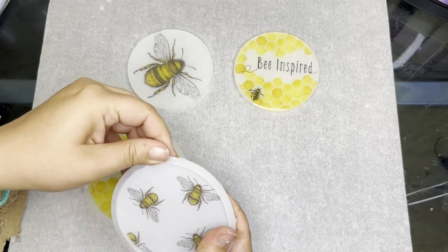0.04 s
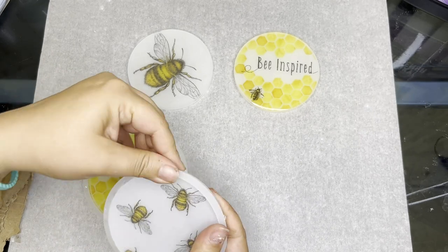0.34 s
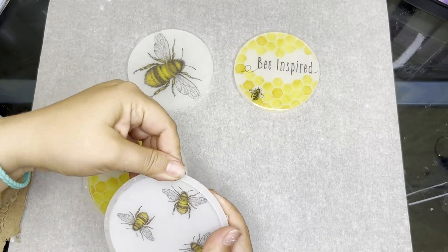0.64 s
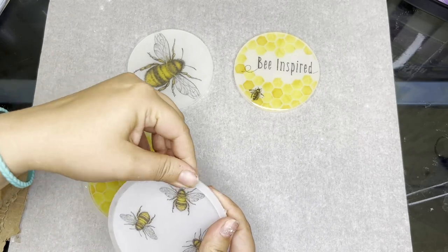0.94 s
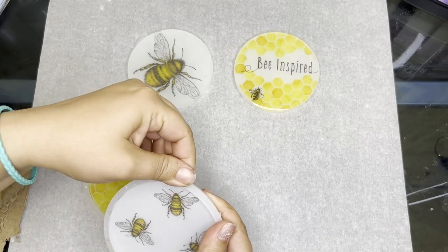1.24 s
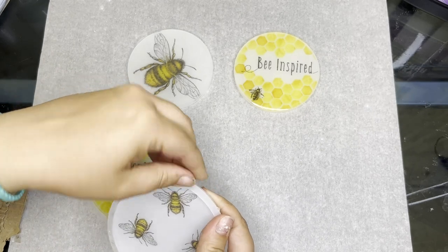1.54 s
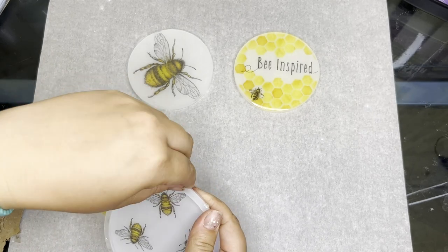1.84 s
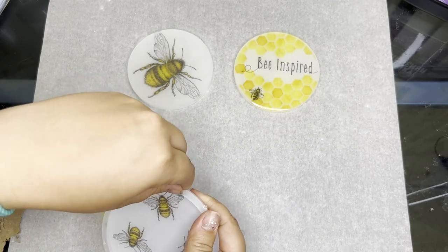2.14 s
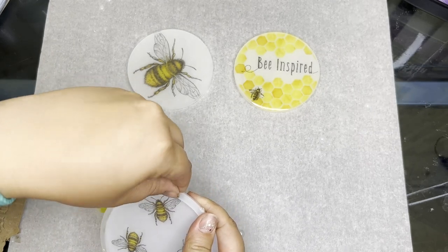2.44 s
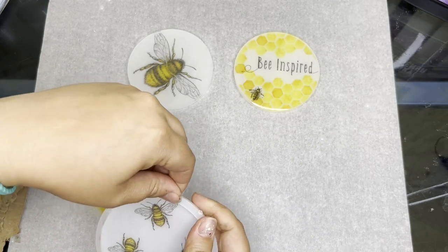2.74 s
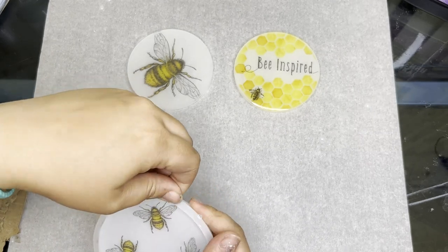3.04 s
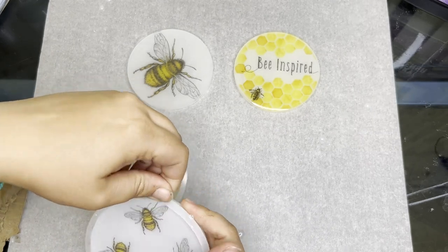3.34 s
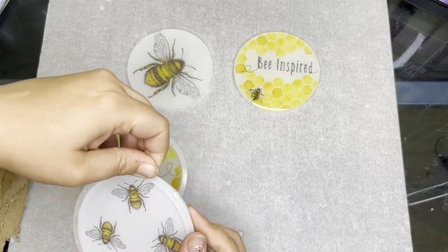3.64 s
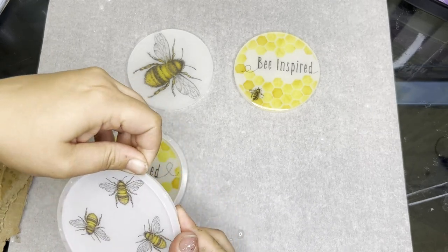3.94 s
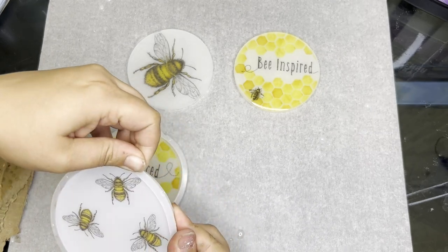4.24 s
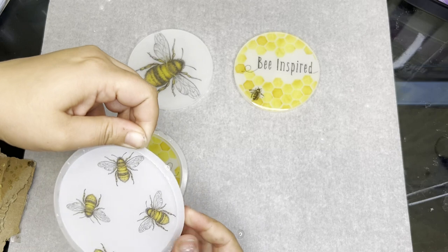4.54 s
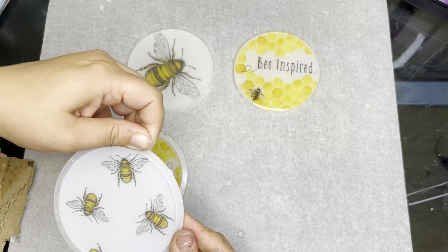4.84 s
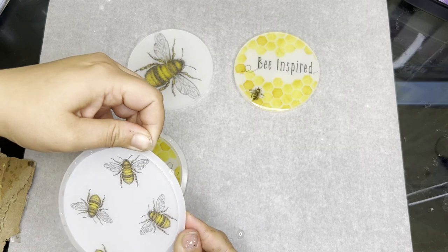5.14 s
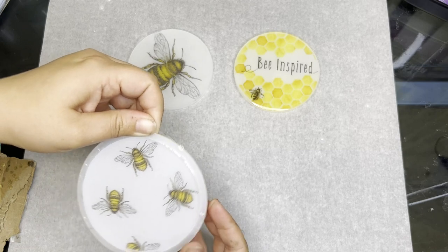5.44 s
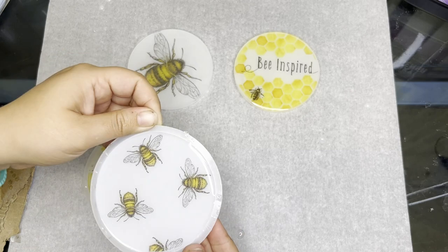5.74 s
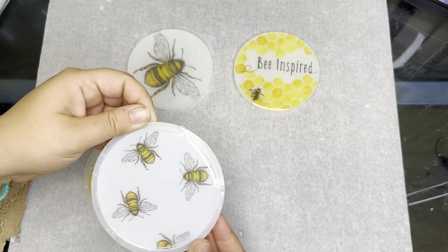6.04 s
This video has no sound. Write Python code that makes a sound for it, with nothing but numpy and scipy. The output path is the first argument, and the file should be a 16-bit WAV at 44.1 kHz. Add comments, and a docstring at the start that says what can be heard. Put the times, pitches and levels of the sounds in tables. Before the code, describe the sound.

Close to the microphone, fingers work a silicone mold off a hardened resin coaster. The rubber lets go of the rim in clusters of tiny, bright snaps and crackling peels, with soft thumb rubbing that is strongest around the middle. Behind this, a fan hums steadily in a small room with a soft hiss and faint high whistles, and a low drone rises and falls like a distant engine.

```python
"""From the start, a fan hums in a small room, with faint high whistles, a soft hiss and a low drone.
Close by, fingers at once begin working a silicone mold off a hardened resin coaster: the rubber lets
go of the rim in tiny snaps and crackling peels, which the room answers briefly. Near 1 s the drone
starts to rise and fall like a distant engine. Around 3 s the hiss is fullest and the thumb rubs the
mold hardest. More snaps follow in clusters until the end, at 6 s, while the fan hums on."""
import sys
import numpy as np
from scipy import signal
from scipy.fft import rfft, irfft
from scipy.io import wavfile

SR = 44100
rng = np.random.default_rng(int(sys.argv[2]) if len(sys.argv) > 2 else 0)


def persist_wave(psi):
    """Save psi, clipped to +-1, as 16-bit WAV."""
    counts = np.round(np.clip(psi, -1, 1) * 32767).astype(np.int16)
    wavfile.write(sys.argv[1], SR, np.atleast_2d(counts).T)


N = 268128
TIME = np.arange(N) / SR
FREQ = np.arange(N // 2 + 1) * SR / N


def undb(db):
    """Turn decibels into a number to multiply a sound by."""
    return 10 ** (np.asarray(db) / 20)


def unit(x):
    """Scale a signal so its average strength (rms) is 1."""
    return x / np.sqrt(np.mean(x ** 2))


def across(points):
    """Join (frequency, value) points into a curve over all frequencies."""
    hz, value = np.transpose(points)
    return np.interp(np.log(FREQ + 1), np.log(hz), value)


def pan(db):
    """Left and right gains that make the left side louder by db."""
    return undb(np.array([[db], [-db]]) / 2)


def walk(rate_hz):
    """A smooth random wobble of about 1; a higher rate wobbles faster."""
    return unit(irfft(rfft(rng.standard_normal(N)) * np.exp(-(FREQ / rate_hz) ** 2), N))


def stroke(peak_s, rise_s, fall_s, hold_s=0):
    """A movement that builds up to a peak, holds, and dies away."""
    return np.exp(-np.maximum(0, np.maximum((peak_s - TIME) / rise_s, (TIME - peak_s - hold_s) / fall_s)))


def decay(age, fade_s):
    """A fade that drops 60 dB in fade_s seconds."""
    return np.exp(-np.log(1000) * age / fade_s)


def colour(x, points):
    """Give a sound a tone colour: its balance of low and high frequencies."""
    cepstrum = irfft(np.log(unit(undb(across(points)))), N)
    # folding makes the filter ring after a click, never before it
    cepstrum[1:N // 2] *= 2
    cepstrum[N // 2 + 1:] = 0
    return irfft(rfft(x) * np.exp(rfft(cepstrum)), N)


# how alike the room sounds in both ears: (frequency [Hz], likeness [0 to 1])
EAR_LIKENESS = [(60, 0.91), (170, 0.8), (300, 0.67), (600, 0.23), (1500, 0.21), (2000, 0.61), (2800, 0.11),
                (4500, 0.18), (9000, 0.029)]
def room_noise(spectrum):
    """Stereo noise of a given colour, as alike in both ears as the room makes it."""
    alike = across(EAR_LIKENESS)
    mid, side = rfft(rng.standard_normal((2, N))) * spectrum * np.sqrt([1 + alike, 1 - alike])
    return unit(irfft([mid + side, mid - side], N))


# tones of the motor and mains power: (pitch [Hz], level [dB], left minus right [dB])
MOTOR_TONES = [(119, -55.5, 5), (151.2, -63, -7.5), (361.4, -68.5, 6), (399.8, -72.5, 4),
               (452.5, -77.5, -10.5), (729, -80, -1.5), (813, -77.5, -1.5), (903.5, -74.5, -1.5),
               (1031, -81, 1), (1456, -77, 0), (2556, -89.5, -3)]
# notes at which the fan's housing rings: (pitch [Hz], width [Hz], level [dB])
HOUSING_NOTES = [(114, 11, -64), (213, 55, -59), (365.3, 12, -65), (507.3, 14, -70), (617.8, 14, -71.5),
                 (712, 36, -69), (809, 17, -71.5), (902, 16, -70), (1039, 15, -77), (1369, 21, -71),
                 (1382, 93, -72), (1464, 18, -74.5), (2690, 150, -85), (4320, 83, -100.5)]
# colour of the rushing air: (frequency [Hz], relative level [dB])
AIR_COLOUR = [(20, -40), (60, 6.5), (130, 2.5), (235, -1.5), (320, -7.5), (450, -9.5), (750, -13),
              (1150, -15), (1550, -21.5), (2000, -30), (2900, -37), (3500, -46), (5500, -54.5), (7700, -50),
              (10000, -57), (13500, -52), (16000, -67.5)]
def fan(hum_hz=199.76, hum_db=-44, air_db=-52):
    """The blades hum, the motor adds weak tones, and rushing air rings the housing."""
    blade_hz = hum_hz + 0.69 * walk(2.16)
    blades = unit(np.sin(2 * np.pi * np.cumsum(blade_hz) / SR))
    hum = blades * undb(hum_db - 0.84 * walk(3.4)) * pan(-4)
    for hz, db, pan_db in MOTOR_TONES:
        phase = 2 * np.pi * (hz * TIME + rng.random()) + .001 * hz * walk(3.0)
        hum += unit(np.sin(phase)) * undb(db + 0.5 * walk(4.3)) * pan(pan_db)
    power = 0
    for hz, width, db in HOUSING_NOTES:
        band = unit(1 / (1 + 2 * ((FREQ - hz) / width) ** 2))
        power += (undb(db) * band) ** 2
    housing = room_noise(np.sqrt(power)) * np.sqrt(np.mean(power))
    air = room_noise(undb(across(AIR_COLOUR))) * undb(air_db + 0.42 * walk(4.9))
    return hum + housing + air


# thin, steady whistles: (pitch [Hz], width [Hz], level [dB])
HIGH_WHISTLES = [(4360, 85, -99), (6170, 70, -100), (7230, 63, -101), (7620, 130, -99.5)]
def whistles(whine_hz=5930, whine_width_hz=110, whine_db=-91, hold_s=2.8, fade_s=2.2):
    """Narrow bands of noise whistle high above the fan; the strongest, a whine, holds and then fades."""
    power = 0
    for hz, width, db in HIGH_WHISTLES:
        band = unit(np.exp(-((FREQ - hz) / width) ** 2))
        power += (undb(db) * band) ** 2
    steady = room_noise(np.sqrt(power)) * np.sqrt(np.mean(power))
    whine = room_noise(np.exp(-((FREQ - whine_hz) / whine_width_hz) ** 2))
    fade = np.exp(-np.maximum(TIME - hold_s, 0) / fade_s)
    return steady + whine * undb(whine_db) * fade


# the engine works harder: (peak time [s], hold [s], firing rate [Hz], relative level [dB])
ENGINE_SURGES = [(0.821, 0.12, 95.25, -44), (1.2, 0.78, 100.3, -43.5), (3.4, 0.62, 89, -50),
                 (4.17, 0.37, 91.2, -43), (5.05, 0.77, 81.4, -53)]
def engine_effort(idle_hz=89, idle_db=-58, rise_s=0.167, fall_s=0.187):
    """The engine's firing rate and level: each surge pulls the rate towards its own as it grows."""
    power = undb(idle_db) ** 2
    weighted_hz = idle_hz * power
    for peak_s, hold_s, hz, db in ENGINE_SURGES:
        surge = (undb(db) * stroke(peak_s, rise_s, fall_s, hold_s)) ** 2
        power += surge
        weighted_hz += hz * surge
    return weighted_hz / power, 10 * np.log10(power)


# colour of the rumble: (frequency [Hz], relative level [dB])
RUMBLE_COLOUR = [(18, -46), (31, -27), (38, 1.5), (50, -2), (60, 3.5), (68, -11.5), (76, -13), (100, 0.5),
                 (140, -10), (300, -45), (1000, -84)]
# rise and fall of the throb and rumble: (time [s], relative level [dB])
RUMBLE_SWELLS = [(0, -52), (.35, -53.5), (.8, -48.5), (1.05, -52), (1.3, -48), (1.55, -56.5), (2.2, -59),
                 (2.6, -57), (3.1, -54), (4.2, -49.5), (4.5, -51), (4.85, -55.5), (5.5, -48), (6.08, -67)]
def distant_engine(throb_ratio=.62, drone_gain_db=-1, low_gain_db=-4):
    """The firing note, a lower throb that follows its speed and a dull rumble come through the walls."""
    hz, drone_db = engine_effort()
    low_db = np.interp(TIME, *np.transpose(RUMBLE_SWELLS)) + low_gain_db + 1.5 * walk(5.1)
    phase = 2 * np.pi * np.cumsum(hz) / SR
    drone = unit(np.sin(phase + 0.25 * walk(8.8))) * undb(drone_db + drone_gain_db)
    throb = unit(np.sin(throb_ratio * phase + .5 * walk(13)))
    rumble = room_noise(undb(across(RUMBLE_COLOUR)))
    return drone * pan(0.99) + (throb + rumble) * undb(low_db) * pan(-1.3)


# colour of the hiss: (frequency [Hz], relative level [dB])
HISS_COLOUR = [(200, -27.5), (700, 4.5), (1600, 11), (2000, 2), (2400, 0), (2820, 9), (3150, 0.5),
               (3500, -6.5), (3850, -6.5), (4250, -3), (4750, -7), (5300, -12), (7500, -17.5),
               (8500, -32.5), (12000, -38.5), (16000, -57.5)]
# rise and fall of the hiss: (time [s], relative level [dB])
HISS_SWELLS = [(0, -77), (1.0, -79), (1.35, -75.5), (1.8, -77.5), (2.6, -73), (3.2, -73), (3.7, -73.5),
               (4.45, -75.5), (4.85, -79.5), (5.3, -81.5), (5.7, -83.5)]
def hiss(gain_db=7, waver_db=1.18, direct_db=-4):
    """A soft, wavering hiss swells and fades; part of it reaches both ears alike."""
    db = np.interp(TIME, *np.transpose(HISS_SWELLS)) + gain_db
    spectrum = undb(across(HISS_COLOUR))
    direct = unit(irfft(rfft(rng.standard_normal(N)) * spectrum, N)) * undb(direct_db)
    return (room_noise(spectrum) + direct) * undb(db + waver_db * walk(21)) * pan(1.5)


# colours of the bright snap and the rim's dull body: (frequency [Hz], relative level [dB])
BRIGHT_COLOUR = [(800, -53.5), (3000, -26), (5500, -6.5), (7600, 0.5), (9000, 0), (10300, -3), (11500, -1),
                 (13500, 1.5), (15000, -5.5), (16000, -11.5)]
DULL_COLOUR = [(400, -44.5), (1200, -15), (2800, -8.5), (4000, -0.5), (5000, 2.5), (6200, 1), (8500, 2.5),
               (11000, -15.5), (16000, -31.5)]
# the rubber lets go of the rim: (time [s], relative snap level [dB], relative crackle level [dB],
# dull minus bright [dB], pitch of the freed lip [Hz], extra shiver and twang [dB])
RIM_RELEASES = [(0.023, -54, -78, 9, 7100, 0.5), (0.3048, -68, -76, -2, 7550, 1),
                (0.3155, -58.5, -81, -5, 10100, -5), (0.5093, -69, -94, -7, 8700, 0),
                (0.659, -59.5, -78, -0.5, 5970, 1), (0.7445, -70, -73.5, -13, 9500, 1),
                (0.7597, -72, -87, -6, 13700, 0), (0.7728, -73, -80, -10, 9500, 6),
                (1.3286, -76, -87, 5, 7420, 6), (1.4093, -65, -88, -3, 6840, 1.5),
                (2.2784, -65, -83.5, 0.5, 14000, -4), (2.3972, -61, -75, -13, 9070, 10.5),
                (2.4078, -68.5, -78, 3, 8000, 6), (2.5727, -83, -90, 9, 5100, 4.5),
                (2.665, -74, -90, 0, 12500, 0), (2.818, -67.5, -83, 3, 4900, 1),
                (2.9843, -68, -89, -5, 11000, -1), (3.1704, -52.5, -80, -0.5, 9100, -2.5),
                (3.2137, -75, -93, 5, 4600, 4), (3.272, -70, -77, -13, 9500, 2),
                (3.297, -71, -79, -5, 10800, 0), (3.3765, -66.5, -81, 5.5, 4600, 3),
                (3.455, -77.5, -83, 6, 6600, 1), (3.575, -81, -82.5, -4, 12000, -2),
                (4.3468, -69, -80, -3.5, 5000, 0), (4.3517, -68, -83, 0, 4600, 2),
                (4.3648, -69.5, -87, -3, 11600, 2), (4.3822, -73, -87, -2, 4600, 2),
                (4.421, -69, -79, -2, 8900, -1), (4.4644, -61, -72.5, -8, 5900, 0),
                (4.6528, -81.5, -95, 6, 4600, -1), (5.1068, -78.5, -93, 0, 6470, 2),
                (5.138, -61.5, -89, -12, 13400, -8), (5.1424, -63, -94, -13, 13500, -2),
                (5.4815, -66.5, -81, -14, 11600, 2.5), (5.502, -69, -82, -13.5, 8430, 5.5),
                (5.5066, -74, -89, -8, 8460, 1), (5.537, -73, -92.5, -4, 11800, 2),
                (6.0023, -65, -84, -14, 8700, -4), (6.0126, -67, -76, -2, 11300, 4)]
def snaps(crack_db=16, shiver_db=-5, lip_db=10, rim_hz=4690, rim_db=-8):
    """The rubber cracks free, its lip twangs at a pitch set by its stretch, and the resin rim rings."""
    bright, dull, lip = np.zeros((3, N))
    age = TIME[:SR // 20]
    crack = undb(crack_db) * (age == 0)
    fade = decay(age, fade_s=0.023)
    for start_s, db, _, dull_db, lip_hz, extra_db in RIM_RELEASES:
        # the rim shivers just after the crack
        shiver = unit(rng.standard_normal(len(age)) * fade) * np.sqrt(np.mean(fade ** 2))
        snap = undb(db) * (crack + undb(shiver_db + extra_db) * np.roll(shiver, 2))
        twang = np.sin(2 * np.pi * lip_hz * age) * decay(age, fade_s=0.018)
        span = slice(int(start_s * SR), int(start_s * SR) + len(age))
        bright[span] += snap
        dull[span] += snap * undb(dull_db)
        lip[span] += undb(db + lip_db + extra_db) * twang / np.linalg.norm(twang)
    rim_note = np.sin(2 * np.pi * rim_hz * age) * decay(age, fade_s=.04)
    ring = signal.fftconvolve(dull, rim_note / np.linalg.norm(rim_note))[:N]  # dull snaps ring it most
    return colour(bright, BRIGHT_COLOUR) + colour(dull, DULL_COLOUR) + lip + undb(rim_db) * ring


# the rubber creeps along the rim, often just before it lets go:
# (peak time [s], rise [s], fall [s], relative level [dB], dull minus bright [dB])
RIM_CREEPS = [(.065, 0.013, 0.059, -90, 12), (.18, .04, .06, -94.5, 6), (0.298, .009, .012, -81, -9),
              (.648, .025, .012, -84, -2), (.7, .03, .04, -85, -2), (.88, .08, .25, -94, -3),
              (1.375, 0.038, 0.073, -87, 4.5), (2.66, 0.081, 0.16, -91, 6.5), (3.21, .03, .03, -84, 0),
              (3.305, 0.024, .03, -81, -2.5), (3.372, .018, .06, -81, -1), (3.485, 0.033, 0.053, -89, -2),
              (3.75, .4, .4, -101, 2.5), (4.36, 0.014, .05, -88, 2), (4.47, .012, .04, -82.5, 3),
              (5.128, 0.026, .025, -91, 7.5), (5.31, 0.033, .035, -88, -5), (5.995, 0.023, 0.0086, -89, -1)]
def peels(ticks_per_s=2200, spread_db=0.5, rise_s=0.0072, fall_s=0.025):
    """Swarms of tiny releases crackle around each snap and wherever the rubber creeps."""
    sizes = undb(spread_db * np.minimum(rng.exponential(size=N), 4))
    lets_go = rng.random(N) < ticks_per_s / SR
    ticks = unit(lets_go * sizes * rng.choice([-1, 1], (2, N)))
    crackles = [(peak_s, rise_s, fall_s, db, dull_db) for peak_s, _, db, dull_db, _, _ in RIM_RELEASES]
    bright_power, dull_power = 0, 0
    for peak_s, rise, fall, db, dull_db in RIM_CREEPS + crackles:
        power = (undb(db) * stroke(peak_s, rise, fall)) ** 2
        bright_power += power
        dull_power += power * undb(dull_db) ** 2
    bright = colour(np.sqrt(bright_power) * ticks[0], BRIGHT_COLOUR)
    dull = colour(np.sqrt(dull_power) * ticks[1], DULL_COLOUR)
    return bright + dull


# the microphone's case delays the treble on the left: (frequency [Hz], phase lag [radians])
LEFT_LAG = [(5500, 1.4), (7000, 0.47), (9300, 2.06), (10300, 3.2), (11300, 5.7), (12600, 3.6), (15500, 12)]
def room(dry, echo_db=-11, build_s=0.0053, fade_s=.26):
    """Sound reaches left and right out of step; echoes off near walls build up and die away."""
    left = irfft(rfft(dry) * np.exp(-1j * across(LEFT_LAG)), N)
    age = TIME[:SR // 2]
    build_up = 1 - np.exp(-(age / build_s) ** 2)
    tail = rng.standard_normal((2, len(age))) * decay(age, fade_s) * build_up
    tail /= np.linalg.norm(tail, axis=1, keepdims=True)
    echoes = signal.fftconvolve(dry[None], tail, axes=1)[:, :N]
    return np.array([left, dry]) + undb(echo_db) * echoes


# the mold slides under the thumb: (peak time [s], rise [s], fall [s], level [dB], pitch [Hz])
THUMB_RUBS = [(.45, .3, 0.32, -78.5, 3330), (2.72, .16, 0.16, -73.5, 1660), (2.803, 0.02, 0.043, -67, 2770),
              (3.125, 0.034, 0.026, -72.5, 4300), (3.28, 0.013, 0.034, -62, 2700),
              (3.304, 0.012, 0.027, -64, 2600), (3.39, 0.055, 0.13, -75, 4250),
              (5.05, 0.41, 0.47, -74, 2560)]
# colour of a rub: (frequency [times the pitch], relative level [dB])
RUB_COLOUR = [(.19, -45.5), (.45, -25.5), (.78, -9), (1, 6), (1.16, -7.5), (1.379, -10), (2.2, -30),
              (4.5, -62.5)]
def rubbing(rough_db=2):
    """Skin drags unevenly over rubber; the grip gives each stroke its own pitch."""
    rubs = 0
    for peak_s, rise_s, fall_s, db, hz in THUMB_RUBS:
        spectrum = undb(across([(multiple * hz, gain_db) for multiple, gain_db in RUB_COLOUR]))
        rubs += room_noise(spectrum) * undb(db) * stroke(peak_s, rise_s, fall_s)
    return rubs * undb(-rough_db * walk(90)) * pan(2)


def scene():
    """The hands at work in front of the hiss, the fan and the distant drone."""
    hands = room(snaps() + peels()) * pan(0.27) + rubbing()
    return hands + hiss() + fan() + whistles() + distant_engine()


def record(dry, top_hz=15300):
    """Cut away the very highest treble."""
    return signal.sosfilt(signal.ellip(8, .2, 70, top_hz, fs=SR, output="sos"), dry)


dry = scene()
out = record(dry)
persist_wave(out)
```